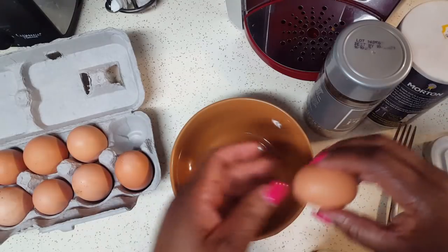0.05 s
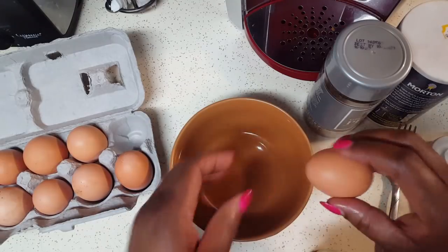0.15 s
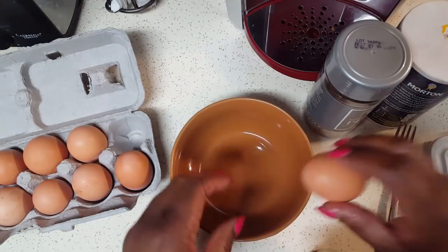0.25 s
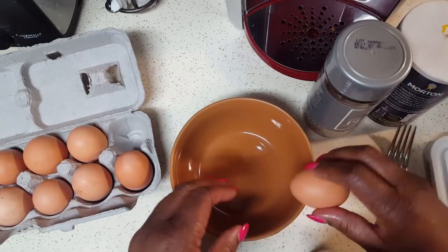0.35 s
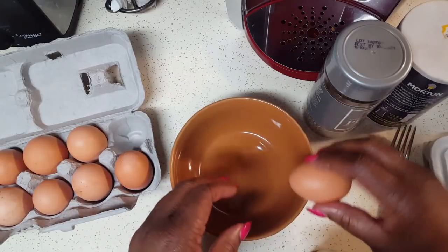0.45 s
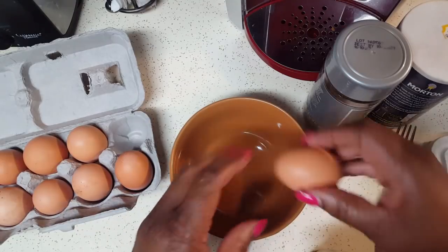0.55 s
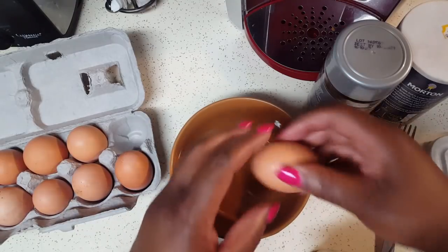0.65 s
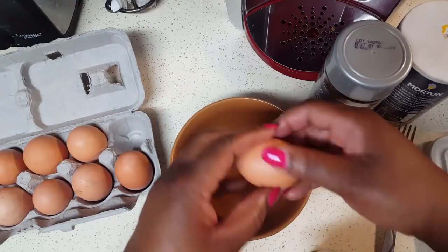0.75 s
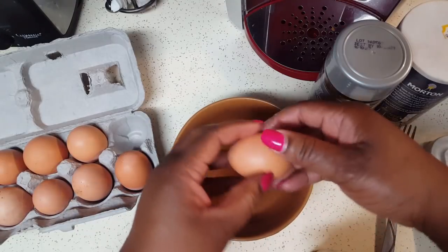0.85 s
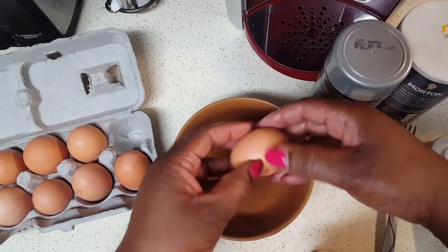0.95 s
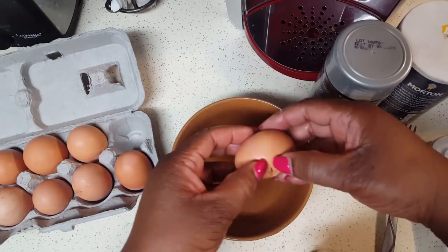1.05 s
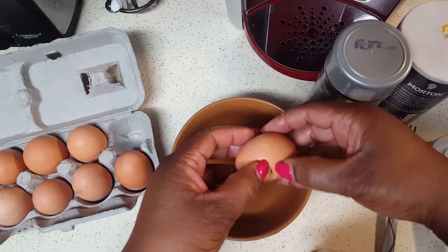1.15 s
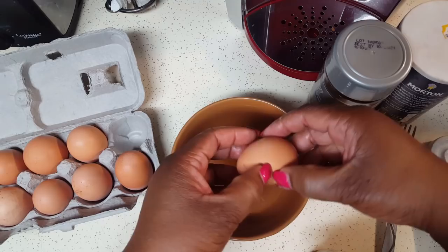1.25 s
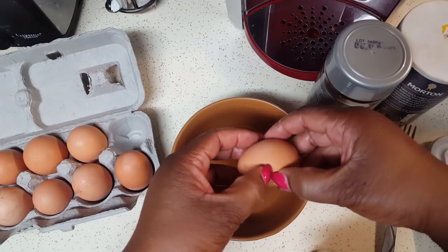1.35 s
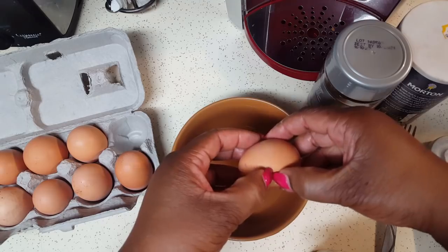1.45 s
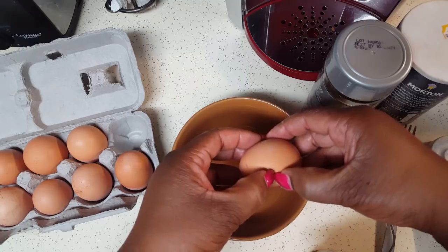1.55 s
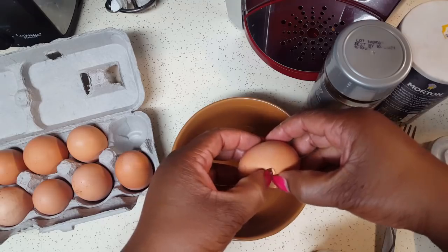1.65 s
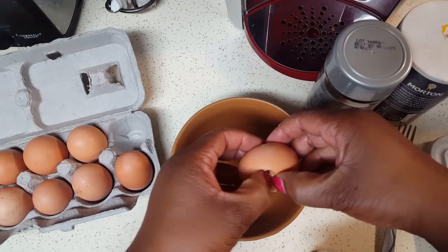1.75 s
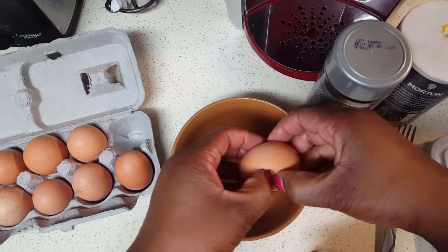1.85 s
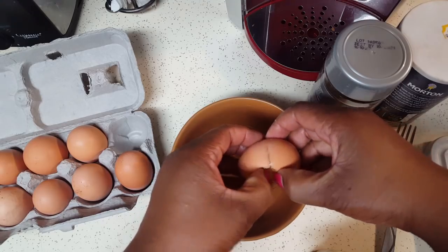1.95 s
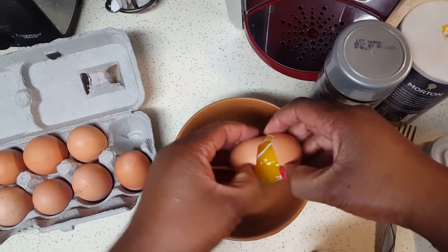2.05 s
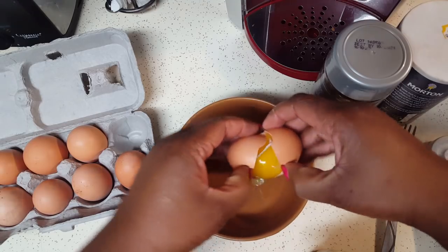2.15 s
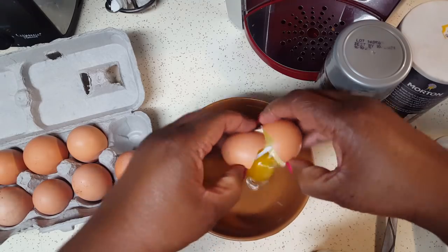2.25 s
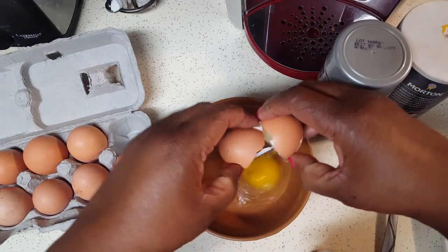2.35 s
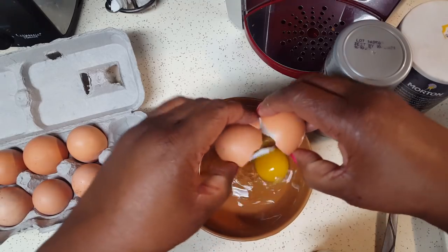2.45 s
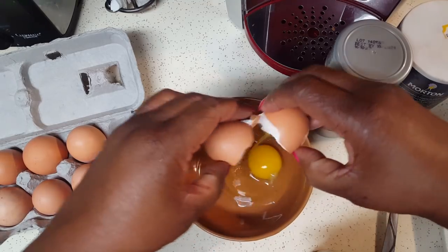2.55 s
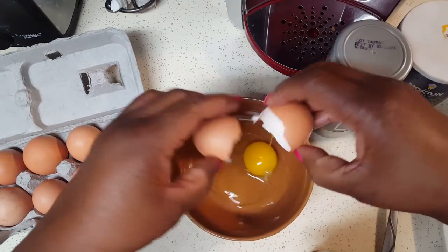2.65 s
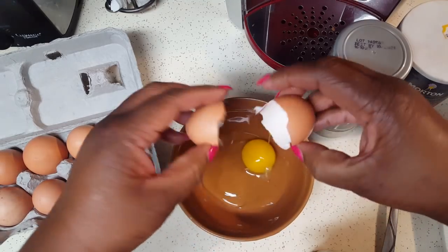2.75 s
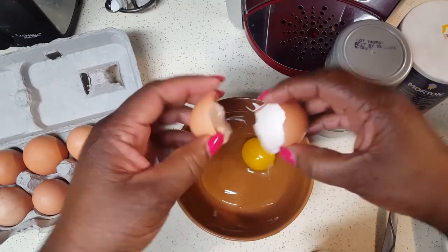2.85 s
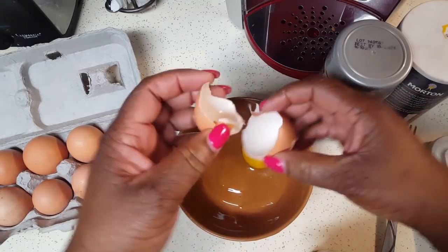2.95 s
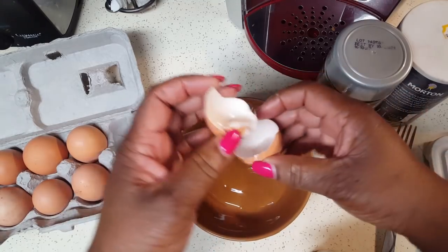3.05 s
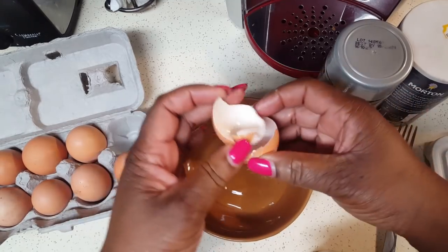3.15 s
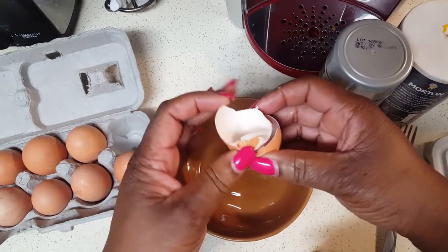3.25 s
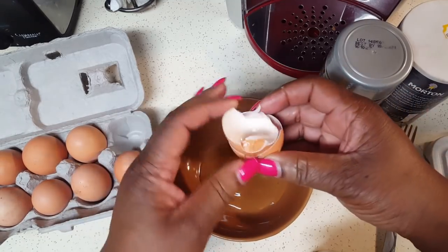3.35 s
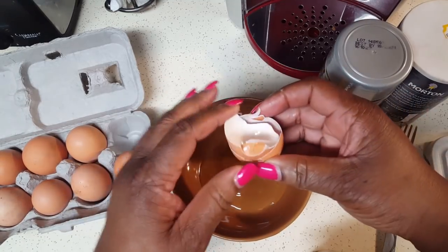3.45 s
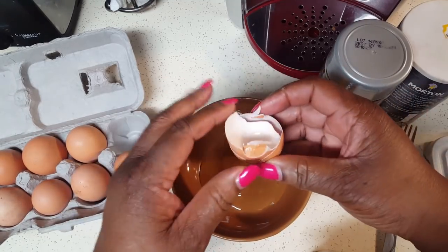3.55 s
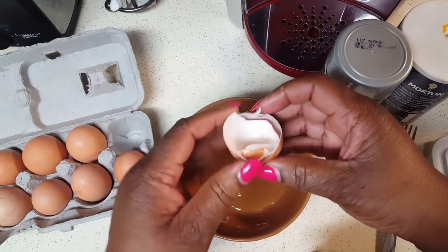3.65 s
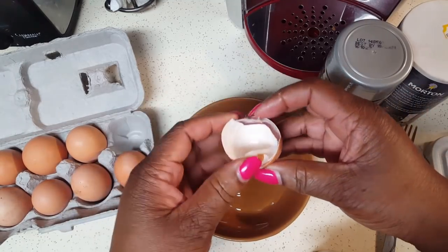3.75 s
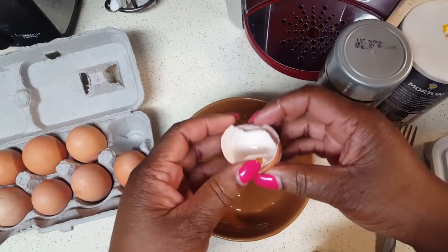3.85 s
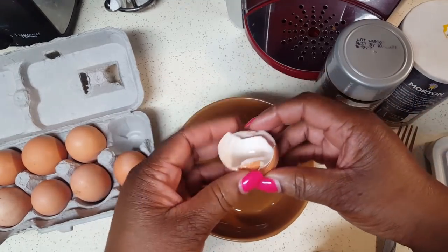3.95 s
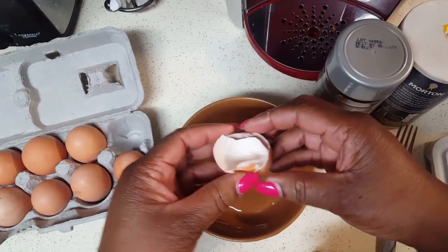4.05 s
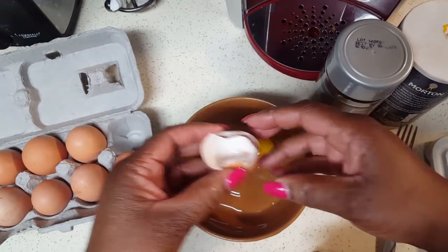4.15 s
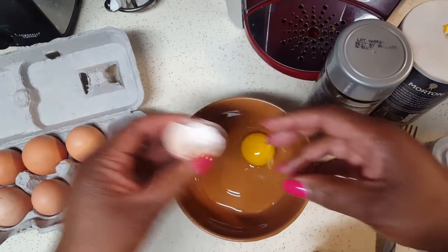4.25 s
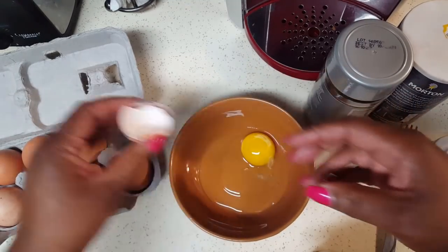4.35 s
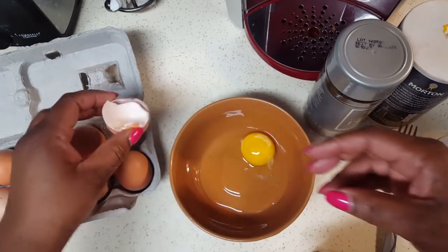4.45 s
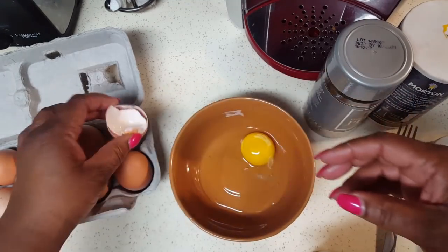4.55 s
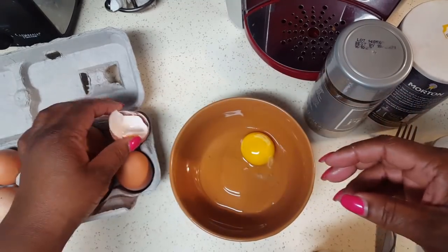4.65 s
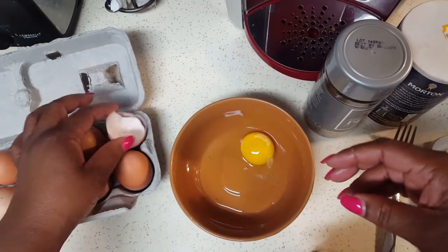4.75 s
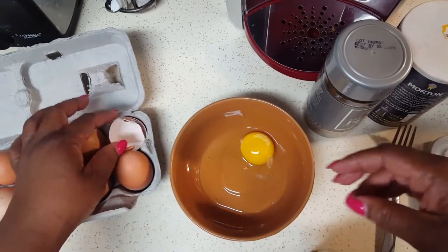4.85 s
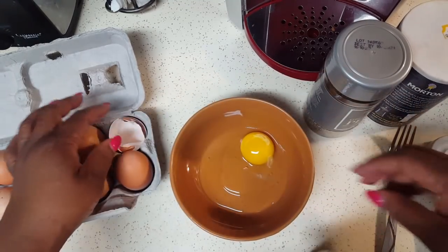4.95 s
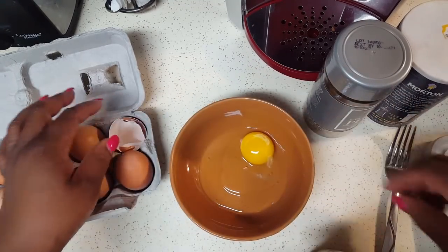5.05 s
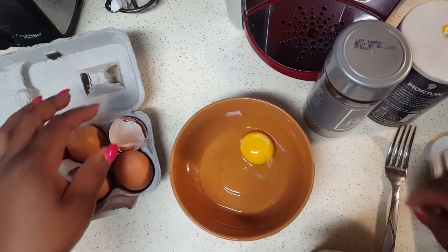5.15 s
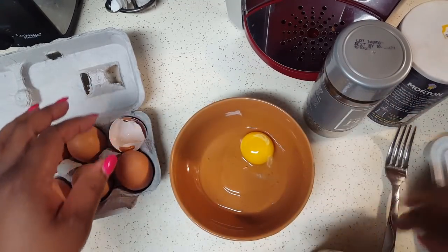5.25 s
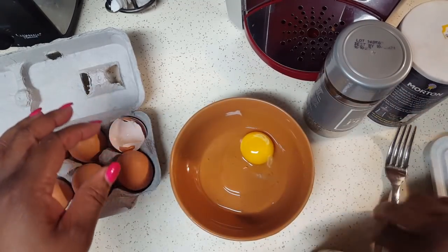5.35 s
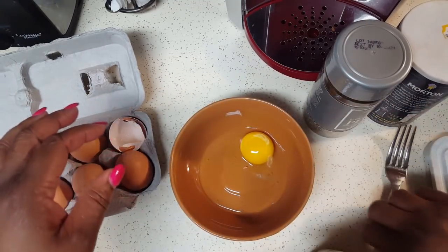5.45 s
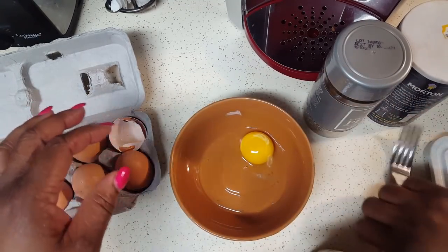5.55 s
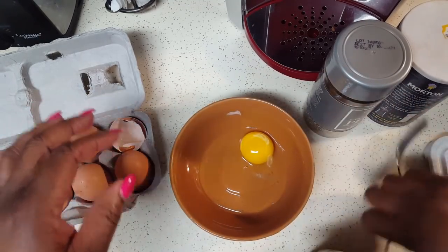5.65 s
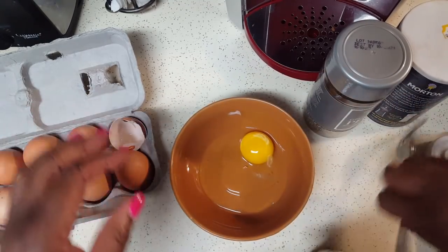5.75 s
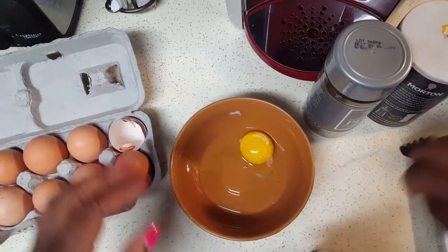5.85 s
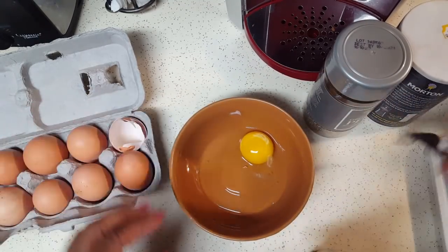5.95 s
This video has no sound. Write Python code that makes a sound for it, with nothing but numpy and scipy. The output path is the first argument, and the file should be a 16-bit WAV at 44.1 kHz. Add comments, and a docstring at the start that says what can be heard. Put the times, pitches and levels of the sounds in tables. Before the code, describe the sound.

In a small, quiet kitchen where an appliance hums faintly, close stereo microphones pick up one sharp knock of an egg on a ceramic bowl. Small nail ticks lead into a run of brittle snaps as the shell is pried open. The empty halves grate together twice, then go into a carton. A few dull bumps on the counter and the light clatter of a fork follow.

```python
"""An egg, knocked once on a ceramic bowl and pried open with the thumbs, close to a stereo microphone pair.
Bowl and kitchen counter ring under the blow. The shell snaps and flakes, then its hollow halves scrape
into each other and are set down in a pulp carton. A hand bumps the counter and picks up a steel fork,
which clinks on the utensil beside it. Behind it all, an appliance hums in the small room."""
import sys
import numpy as np
from scipy import signal
from scipy.fft import rfft, irfft, next_fast_len
from scipy.io import wavfile

SR = 44100
rng = np.random.default_rng(int(sys.argv[2]) if len(sys.argv) > 2 else 0)


def transcribe(u):
    """Save the signal u as a 16-bit wav file named by the first command-line argument.

    u: samples, shape (n,) or (channels, n), limited to [-1, 1]; the rate is SR.
    q: integer samples, one column per channel.
    """
    v = np.clip(np.atleast_2d(u).T, -1, 1)
    q = np.round(v * 32767).astype(np.int16)
    wavfile.write(sys.argv[1], SR, q)


N = 265041


def amp(db):
    """Decibels to gain."""
    return 10 ** (np.asarray(db) / 20)


def read(points, hz):
    """A table's value on a log-frequency axis."""
    f, value = np.transpose(points)
    return np.interp(np.log(hz + 1), np.log(f), value)


def clock(length):
    """Sample times of a sound of this length."""
    return np.arange(int(length * SR)) / SR


def unit_rms(x):
    """Scales to unit rms."""
    return x / np.sqrt(np.mean(x ** 2) + 1e-20)


def unit_hit(x):
    """Scales a hit to the energy of 10 ms at unit rms."""
    return unit_rms(x) * np.sqrt(.01 * SR / x.shape[-1])


def add(mix, s, sound, left_db=0):
    """Mixes a stereo sound in at time s, left_db louder at the left microphone."""
    part = mix[:, round(s * SR):][:, :sound.shape[1]]
    part += sound[:, :part.shape[1]] * amp([[left_db / 2], [-left_db / 2]])


# Likeness of the two microphones for nearby sounds: (frequency [Hz], coherence [0-1])
PAIR_COHERENCE = [(50, 0.91), (350, 1), (700, 0.66), (1400, 0.091), (3000, 0.079), (8000, 0.034)]

def coloured(x, spectrum, coherence=PAIR_COHERENCE):
    """Gives two unrelated signals a spectrum, and makes their bass alike as at two close microphones."""
    size = next_fast_len(x.shape[1])
    a, b = rfft(x, size)
    hz = np.fft.rfftfreq(size, 1 / SR)
    same = np.clip(read(coherence, hz), -1, 1)
    pair = np.array([a, same * a + np.sqrt(1 - same ** 2) * b])
    return unit_rms(irfft(pair * amp(read(spectrum, hz)), size)[:, :x.shape[1]])


def burst(spectrum, t60, rise, size=2048):
    """Decaying noise: a dense cluster of resonances, struck at once."""
    t = np.arange(size) / SR
    noise = coloured(rng.standard_normal((2, size)), spectrum)
    return unit_hit(noise * amp(-60 * t / t60) * (1 - np.exp(-t / rise)))


def ring(modes, lag=0, scatter=0, length=0.73):
    """Struck modes; the right microphone hears them later by lag radians, give or take scatter."""
    t = clock(length)
    out = np.zeros((2, len(t)))
    for hz, db, t60 in modes:
        phase = np.array([[0], [lag + scatter * rng.standard_normal()]]) + rng.uniform(-1.93, 1)
        out += amp(db - 60 * t / t60) * np.sin(2 * np.pi * hz * t - phase)
    # a small body radiates little below its lowest mode
    low_cut = signal.butter(2, .7 * min(modes)[0], "high", fs=SR, output="sos")
    return unit_hit(signal.sosfilt(low_cut, out * (1 - np.exp(-t / 0.00042))))


def hollow(shape, hz, lag):
    """A thin cavity at a given pitch: the higher it rings, the sooner it dies."""
    return ring([(ratio * hz, db, cycles / hz) for ratio, db, cycles in shape], lag, length=.05)


# Kitchen air: (frequency [Hz], relative density [dB])
AIR_SPECTRUM = [(15, -71), (25, -32.5), (63, -5), (92, -15), (205, -3), (297, -5), (322, -11), (358, -8),
                (443, -11), (520, -13.5), (679, -17.5), (735, -13), (1390, -26.5), (2310, -30),
                (14500, -37)]
# Its likeness at the two microphones: (frequency [Hz], coherence [0-1])
AIR_COHERENCE = [(25, 1), (70, 0.84), (200, 0.97), (450, 0.36), (900, 0.32), (2000, 0.08), (5000, 0.045),
                 (12000, .05)]
# The appliance in the background: (frequency [Hz], relative level [dB])
HUM_PARTIALS = [(118.4, -64), (215.3, -59.5), (258.4, -70), (296.1, -64), (355.3, -57.5), (414.5, -68.5),
                (473.7, -68.5), (522.2, -66)]

def room_tone(air_db=-54, hum_db=-2, waver_cycles=0.31, left_db=1.0):
    """Steady room noise and the slightly wavering hum of an appliance."""
    t = np.arange(N) / SR
    air = amp(air_db) * coloured(rng.standard_normal((2, N)), AIR_SPECTRUM, AIR_COHERENCE)
    knots = np.linspace(0, t[-1], 40)
    hum = 0
    for hz, db in HUM_PARTIALS:
        drift = np.interp(t, knots, waver_cycles * rng.standard_normal(len(knots)))
        hum = hum + amp(db + hum_db) * np.sqrt(2) * np.sin(2 * np.pi * (hz * t + drift))
    return (air + hum) * amp([[left_db / 2], [-left_db / 2]])


# Breaking shell, and the egg's weight landing: (frequency [Hz], relative density [dB])
SHELL_TICK = [(40, -31), (150, -30), (450, -15.5), (900, -3), (1500, -1), (3000, -0.5), (7000, -3),
              (10000, -2.5), (14000, -5), (16000, -9)]
EGG_THUD = [(30, -36.5), (75, -19), (110, -0.5), (165, -15.5), (320, -2.5), (560, 3.5), (700, -6),
            (900, 2.5), (1150, -8.5), (1450, -3), (1900, -6.5), (2600, -16.5), (5000, -21), (15000, -22.5)]
# The bowl, and the laden counter under it: (frequency [Hz], relative level [dB], t60 [s])
BOWL_MODES = [(1380, -3.5, 0.35), (1382, 11.5, 0.13), (1535, -4.5, 0.07), (1526, -4, 0.054),
              (1788, -6.5, 0.082), (2110, -14.5, 0.14), (2370, -16, 0.14), (3180, 4.5, 0.05),
              (3170, -26, 0.62), (4570, -24, .14), (5440, -19.5, .28)]
COUNTER_MODES = [(260.8, -2.5, .33), (340.2, 8, 0.12), (491, -4.5, 0.43), (561, -1.5, 0.2),
                 (738, -2.5, 0.15), (878, -2, 0.27), (1141, -12, 0.42)]
# Egg on bowl: (time [s], crack [dB], thud [dB], bowl ring [dB], counter ring [dB])
EGG_KNOCKS = [(0.4534, -20.5, -13, -15.5, -22)]

def knock(boom_hz=104.7, boom_t60=.14, boom_db=-30):
    """Left of centre, the shell gives way; a millisecond later the egg lands on bowl and counter."""
    out = np.zeros((2, N))
    for s, crack_db, thud_db, bowl_db, counter_db in EGG_KNOCKS:
        landing = s + .0009
        add(out, s, amp(crack_db) * burst(SHELL_TICK, t60=0.0146, rise=.0001), left_db=2.5)
        add(out, landing, amp(thud_db) * burst(EGG_THUD, t60=0.075, rise=0.00027, size=8192), left_db=0.5)
        add(out, landing, amp(bowl_db) * ring(BOWL_MODES, lag=-1.7, scatter=0.55), left_db=4)
        add(out, landing, amp(counter_db) * ring(COUNTER_MODES), left_db=4.5)
        add(out, landing, amp(boom_db) * ring([(boom_hz, 0, boom_t60)]))  # the whole counter top gives
    return out


EGG_HZ = 1442  # pitch of the closed egg
# Thumbnails on the closed egg: (time [s], relative level [dB])
THUMBNAIL_TICKS = [(0.861, -52.5), (1.1802, -54.5), (1.4056, -59.5), (1.4233, -53.5), (1.5075, -51),
                   (1.8023, -51)]
# Fractures: (time [s], relative ring [dB], pitch [Hz], relative tick [dB])
SHELL_SNAPS = [(1.2137, -41.5, 1885, -76), (1.8443, -32.5, 1880, -38), (1.8486, -28, 1850, -34),
               (2.1117, -20, 4590, -33.5), (2.1129, -21.5, 5090, -45.5), (2.1334, -26.5, 3170, -47),
               (2.1498, -25.5, 2710, -44.5), (2.219, -47, 4840, -53.5), (2.2781, -11.5, 1875, -47),
               (2.2942, -22, 1810, -54), (2.3317, -25.5, 1850, -53), (2.3616, -24, 1870, -43),
               (2.37, -28.5, 2080, -49), (2.428, -52, 2200, -53), (2.4554, -57, 2360, -51),
               (2.503, -28.5, 3290, -52), (2.5337, -34.5, 1950, -65), (2.5505, -35.5, 3130, -53),
               (2.56, -36, 2340, -46), (2.6274, -37, 1930, -42), (2.6898, -50, 2220, -47),
               (3.27, -40.5, 2900, -61), (3.2867, -27, 1780, -47), (3.4698, -26.5, 1700, -41.5),
               (3.7691, -37.5, 1700, -77), (3.8942, -45, 1750, -54), (4.1555, -32, 3060, -51.5),
               (4.7364, -40.5, 4750, -42)]
# The nearly closed shell: (pitch multiple [ratio], relative level [dB], t60 [cycles])
SHELL_MODES = [(1, 1, 38), (1.14, 5.5, 8.5), (.83, -43, 10), (1.36, -20, 29), (1.72, -4.5, 11)]

def snaps(ring_db=-14, first_db=-1, second_db=-6, egg_ring_db=9.5):
    """Close to the microphones, each nail tick or fracture clicks twice and rings the shell's hollow."""
    out = np.zeros((2, N))
    nails = [(s, db + egg_ring_db, EGG_HZ, db) for s, db in THUMBNAIL_TICKS]
    for s, cavity_db, hz, tick_db in nails + SHELL_SNAPS:
        start = s + .0007
        add(out, start, amp(first_db + tick_db) * burst(SHELL_TICK, t60=0.011, rise=0.00037), left_db=2.5)
        second = start + rng.uniform(0.001, 0.007)
        add(out, second, amp(second_db + tick_db) * burst(SHELL_TICK, t60=0.029, rise=0.0001), left_db=4)
        add(out, start, amp(ring_db + cavity_db) * hollow(SHELL_MODES, hz, lag=1.0), left_db=3.0)
    return out


# An open half shell: (pitch multiple [ratio], relative level [dB], t60 [cycles])
HALF_SHELL_MODES = [(1.006, 3, 32.5), (1.09, 5, 10), (0.9, -7, 20), (1.42, -2, 10.5), (1.72, 4, 8.5),
                    (2.95, -12.5, 12)]

def friction(ring_gain, grit_gain, hz, slips_per_s=1800, spread_db=4, contacts=3):
    """Rough edges catch and slip at a few points of contact; every slip ticks and rings the hollow."""
    n = len(ring_gain)
    slipping = rng.random(n) < slips_per_s / SR
    size = amp(spread_db * np.minimum(rng.exponential(1, n), 3))
    slips = unit_rms(slipping * size * rng.choice([-1, 1], n))
    contact = rng.integers(0, contacts, n)
    cavity = signal.fftconvolve((slips * ring_gain)[None], hollow(HALF_SHELL_MODES, hz, lag=0.92), axes=1)
    grit = 0
    for k in range(contacts):
        tick = burst(SHELL_TICK, t60=0.0036, rise=.0001)
        grit = grit + signal.fftconvolve((slips * grit_gain * (contact == k))[None], tick, axes=1)
    out = np.zeros(cavity.shape)
    for sound, gain, left_db in (cavity, ring_gain, 4), (grit, grit_gain, 2):
        add(out, 0, unit_rms(sound) * np.linalg.norm(gain) / np.sqrt(sound.shape[1]), left_db)
    return out


def rub(length, ring_db, grit_db, hz):
    """One short stroke: the pressure swells and lets go in an arch."""
    pressure = np.sqrt(np.sin(np.pi * clock(length) / length))
    return friction(amp(ring_db) * pressure, amp(grit_db) * pressure, hz)


# Thumbnails in the crack: (time [s], length [s], level [dB])
THUMBNAIL_DIGS = [(1.391, 0.049, -51.5), (1.721, 0.026, -51.5), (1.77, 0.021, -55.5), (1.986, 0.021, -54)]
# Shell on fingers, shell and carton; fork on counter: (time [s], length [s], level [dB], pitch [Hz])
SHORT_RUBS = [(1.055, 0.046, -52, 1980), (2.266, 0.031, -33.5, 2090), (2.283, 0.06, -50, 1990),
              (3.136, 0.051, -59.5, 1755), (3.681, 0.034, -47.5, 1700), (3.879, 0.022, -53, 1630),
              (4.129, 0.012, -45.5, 1700), (4.148, 0.019, -38.5, 1680), (4.721, 0.045, -55.5, 2660),
              (4.865, 0.043, -46.5, 900), (4.873, 0.035, -48.5, 2720), (5.616, 0.035, -52, 1046),
              (5.712, 0.03, -51, 2520)]

def scrapes(fumble_count=6, fumble_db=-59.5, fumble_hz=1700, typical_ring_db=-54.5, typical_grit_db=-67):
    """Thumbnails grind in the crack; shell and fork are turned and slid."""
    out = np.zeros((2, N))
    for s, length, db in THUMBNAIL_DIGS:
        add(out, s, rub(length, db - 13, db, EGG_HZ))  # the full egg damps its own ring
    start, end = 3.6, 4.3  # the fingers keep turning the nested halves
    times = start + (end - start) * (np.arange(fumble_count) + rng.random(fumble_count)) / fumble_count
    fumbles = [(s, 0.031, fumble_db, fumble_hz) for s in times]
    for s, length, db, hz in SHORT_RUBS + fumbles:
        grit_db = typical_grit_db + 0.52 * (db - typical_ring_db)  # pressure adds more ring than grit
        add(out, s, rub(length, db, grit_db, hz))
    return out


# The shell is pulled apart: (start [s], end [s], faintest flake [dB])
FLAKE_SPANS = [(1.715, 2.26, -63.5), (2.261, 2.468, -62), (2.471, 2.716, -66)]

def crackle(spread_db=4.0, count=14):
    """Tiny flakes of shell and the wet membrane let go between the larger snaps."""
    out = np.zeros((2, N))
    for start, end, level_db in FLAKE_SPANS:
        for when, size in rng.random((count, 2)):
            flake_db = level_db + spread_db * min(-np.log(size), 3)
            add(out, start + when * (end - start), amp(flake_db) * burst(SHELL_TICK, t60=0.0099, rise=.0001))
    return out


# Two pushes of shell into shell, a list each: (time [s], relative ring [dB], relative grit [dB])
NESTING_STROKES = [
    [(3.28, -71, -71), (3.288, -38.5, -49), (3.314, -35.5, -46.5), (3.338, -44, -54), (3.344, -42, -59),
     (3.356, -39, -50), (3.366, -51, -64), (3.384, -51, -72), (3.4, -63, -70)],
    [(3.4, -69, -69), (3.416, -45, -62), (3.432, -51, -54.5), (3.484, -43, -42), (3.494, -28.5, -31.5),
     (3.502, -25.5, -33.5), (3.534, -49, -63), (3.546, -33, -49), (3.57, -63, -70)],
]

def nesting(edge_db=1, contrast=1.18, first_hz=1758, sag_hz_per_s=530):
    """The broken rims grate as one half slides into the other; the closing hollow rings lower on push two."""
    out = np.zeros((2, N))
    first_s = NESTING_STROKES[0][0][0]
    for stroke in NESTING_STROKES:
        s, *levels = np.transpose(stroke)
        t = s[0] + clock(s[-1] - s[0])
        # contrast deepens the dips below each stroke's peak
        ring_db, grit_db = (db.max() + contrast * np.interp(t, s, db - db.max()) for db in levels)
        hz = first_hz - sag_hz_per_s * (s[0] - first_s)
        add(out, s[0], friction(amp(ring_db), amp(edge_db + grit_db), hz))
    return out


# Bumps on carton and counter: (time [s], thump [dB], pitch [Hz], hollow ring [dB], crunch [dB])
SOFT_BUMPS = [(4.777, -47, 980, -36.5, -52), (4.9239, -38, 917, -37, -35), (4.930, -50.5, 823, -36.5, -60),
              (5.517, -35, 785, -39.5, -45.5), (5.744, -40, 1566, -40, -28),
              (5.9169, -30.5, 574, -41, -36.5)]
# The counter's thump: (frequency [Hz], relative density [dB])
COUNTER_THUMP = [(25, -36), (50, -33), (80, -12), (115, 2), (200, -10), (350, -6), (550, -5.5),
                 (800, -26.5), (1500, -24.5), (4000, -48)]
# The pulp carton: (pitch multiple [ratio], relative level [dB], t60 [cycles])
CARTON_MODES = [(1, 4.5, 28.5), (1.17, -3, 25.5), (.8, -7, 33.5), (1.45, -1.5, 22), (1.85, -3.5, 26)]

def bumps(brush_s=0.017, brush_ring_db=-11, brush_grit_db=-17):
    """A little to the left, a brush of first contact, then a low thump, a dull ring and a short crunch."""
    out = np.zeros((2, N))
    for s, thump_db, hz, hollow_db, crunch_db in SOFT_BUMPS:
        add(out, s - brush_s, rub(brush_s, hollow_db + brush_ring_db, crunch_db + brush_grit_db, hz))
        add(out, s, amp(thump_db) * burst(COUNTER_THUMP, t60=0.099, rise=0.00034, size=8192), left_db=3)
        add(out, s, amp(hollow_db) * hollow(CARTON_MODES, hz, lag=1.0), left_db=3.5)
        add(out, s, amp(crunch_db) * burst(SHELL_TICK, t60=0.033, rise=0.00046), left_db=2)
    return out


# Fork on utensil: (time [s], clatter [dB], fork ring [dB], utensil ring [dB])
FORK_CLINKS = [(5.7423, -29, -26.5, -64), (5.7488, -31.5, -50, -61), (5.8133, -40.5, -42, -70),
               (5.877, -45.5, -52, -62), (5.9183, -62, -42.5, -36.5)]
# Steel on steel: (frequency [Hz], relative density [dB])
STEEL_CLATTER = [(60, -39), (500, -8.5), (2000, -11), (3300, -10), (5500, -8), (7400, -4.5), (9000, -6),
                 (11400, -7), (14000, -11), (16000, -14)]
# The fork, and the utensil beside it: (frequency [Hz], relative level [dB], t60 [s])
FORK_MODES = [(3120, -3, 0.11), (3450, -4, 0.11), (4743, -13, .25), (5970, -12, 0.15), (6600, -26, 0.18),
              (7100, -14, 1), (7230, 1, 0.12), (7500, 8, 0.049), (8460, -22, .25), (9550, -10, .28),
              (10760, -15, 0.22), (11440, 9, 0.066), (11630, 8, 0.067), (13570, -5, 0.3)]
UTENSIL_MODES = [(2533, 17, 0.027), (2700, -3, 0.072), (3460, 7.5, 0.024), (4044, -14, 0.87),
                 (8070, -3, 0.3)]

def fork():
    """The fork clatters against its neighbour and both ring on, toward the left microphone."""
    out = np.zeros((2, N))
    for s, clatter_db, fork_db, utensil_db in FORK_CLINKS:
        add(out, s, amp(clatter_db) * burst(STEEL_CLATTER, t60=0.039, rise=0.00015, size=4096))
        add(out, s, amp(fork_db) * ring(FORK_MODES, scatter=.8, length=.28), left_db=4)
        add(out, s, amp(utensil_db) * ring(UTENSIL_MODES, scatter=.9, length=.28), left_db=2)
    return out


# The small kitchen's decay: (frequency [Hz], t60 [s])
KITCHEN_DECAY = [(100, 0.54), (500, 0.37), (1500, 0.35), (4000, 0.35), (9000, 0.28), (15000, 0.21)]

def kitchen(x, gap_s=0.0054):
    """Close walls and cupboards answer within milliseconds, each band dying at its own speed."""
    wall_spectrum = [(50, -7.0), (110, -7), (600, -1.0), (2000, -0.5), (6000, -0.5), (14000, 2.0)]
    reflections = coloured(rng.standard_normal((2, SR)), wall_spectrum)
    hz, t, bands = signal.stft(reflections, SR, nperseg=256)
    tail = signal.istft(bands * amp(-60 * t / read(KITCHEN_DECAY, hz)[:, None]), SR, nperseg=256)[1]
    tail *= np.clip(np.arange(tail.shape[1]) / SR / gap_s - .5, 0, 1)
    return signal.fftconvolve(x, tail / np.linalg.norm(tail[0]), axes=1)[:, :N]


def scene(lowest_hz=62, knock_wet_db=-6.5, shell_wet_db=-9.5, side_wet_db=-5):
    """The shell is nearest the microphones and driest; bowl, carton and fork stir the room more."""
    bowl = knock()
    shell = snaps() + scrapes() + nesting() + crackle()
    side = bumps() + fork()
    room = kitchen(amp(knock_wet_db) * bowl + amp(shell_wet_db) * shell + amp(side_wet_db) * side)
    # small things radiate no deep bass
    low_cut = signal.butter(3, lowest_hz, "high", fs=SR, output="sos")
    return signal.sosfilt(low_cut, bowl + shell + side + room) + room_tone()


# The microphones' response: (frequency [Hz], gain [dB])
MIC_RESPONSE = [(20, 0), (14400, 0), (15000, -15), (16000, -32)]
BAND_LIMIT_HZ = 16400

def record(dry):
    """The microphones' treble droop, then the band limit."""
    heard = irfft(rfft(dry) * amp(read(MIC_RESPONSE, np.fft.rfftfreq(N, 1 / SR))), N)
    low_pass = signal.firwin(255, BAND_LIMIT_HZ, window=("kaiser", 9), fs=SR)
    return signal.oaconvolve(heard, low_pass[None], "same")


dry = scene()
out = record(dry)
transcribe(out)
```